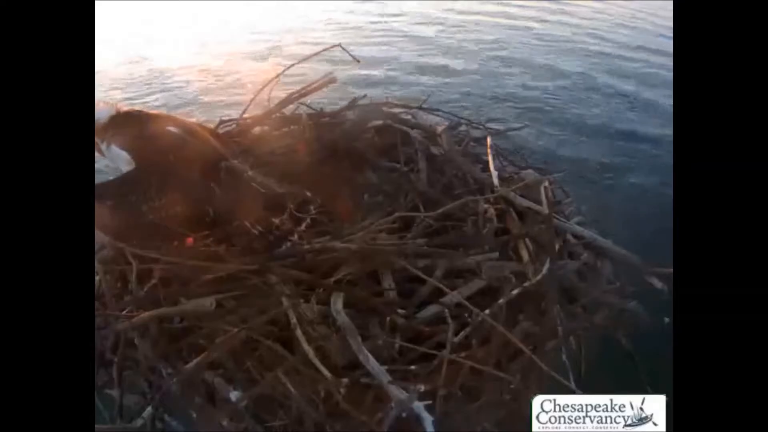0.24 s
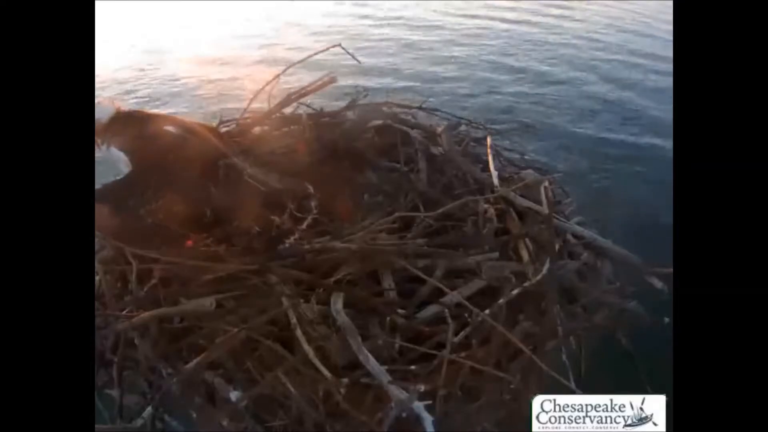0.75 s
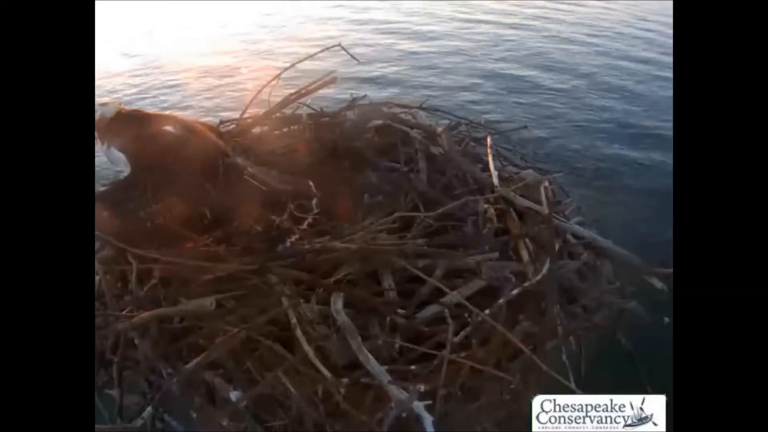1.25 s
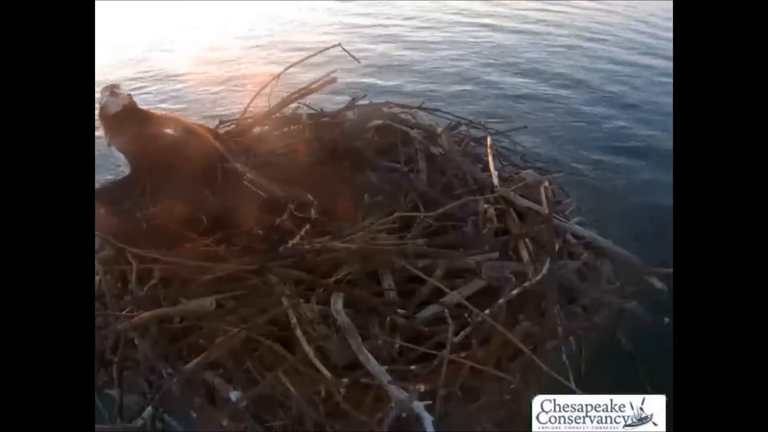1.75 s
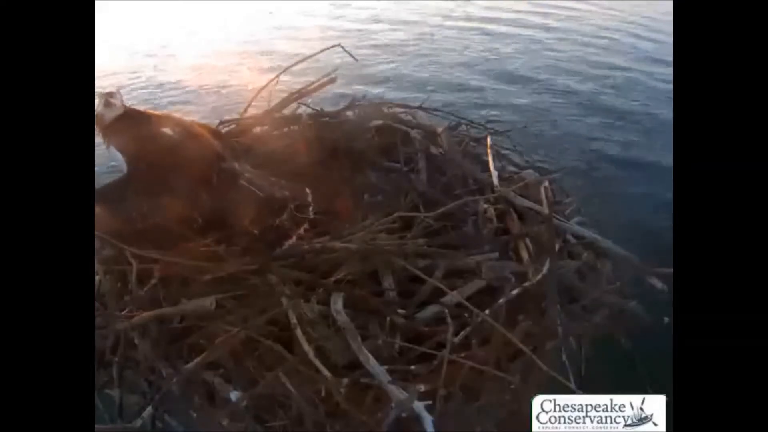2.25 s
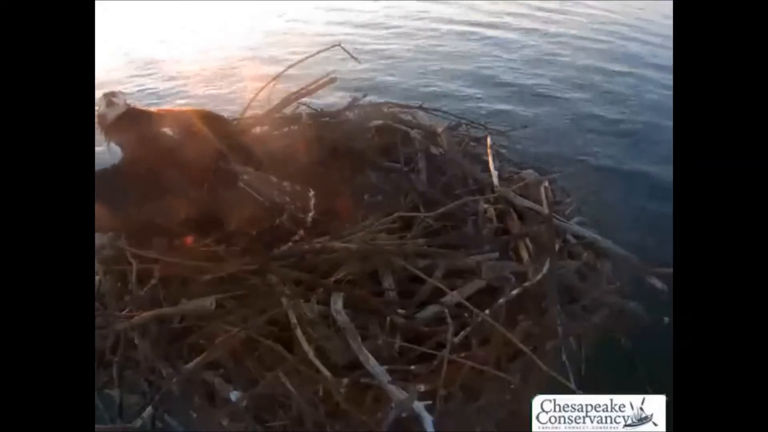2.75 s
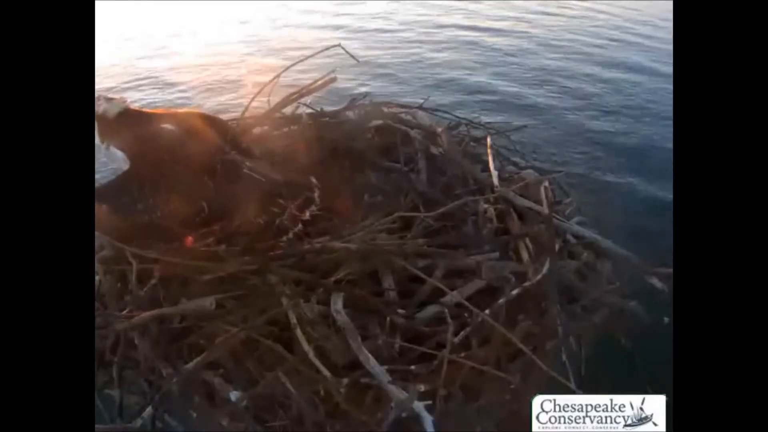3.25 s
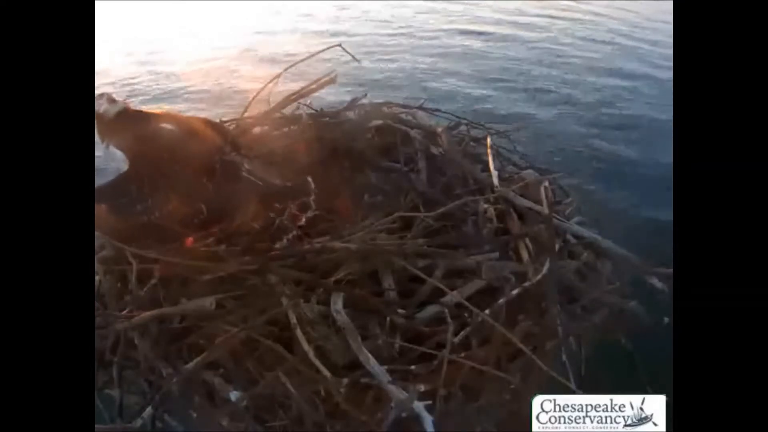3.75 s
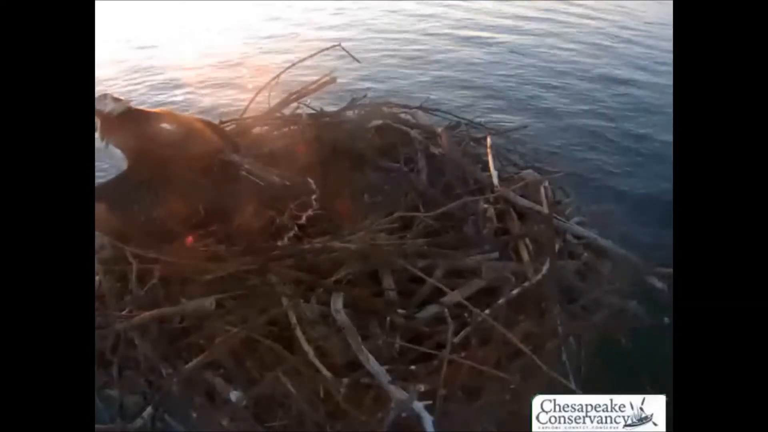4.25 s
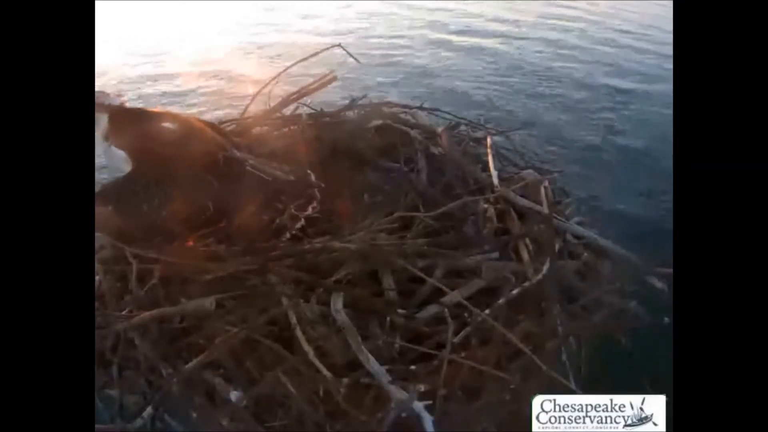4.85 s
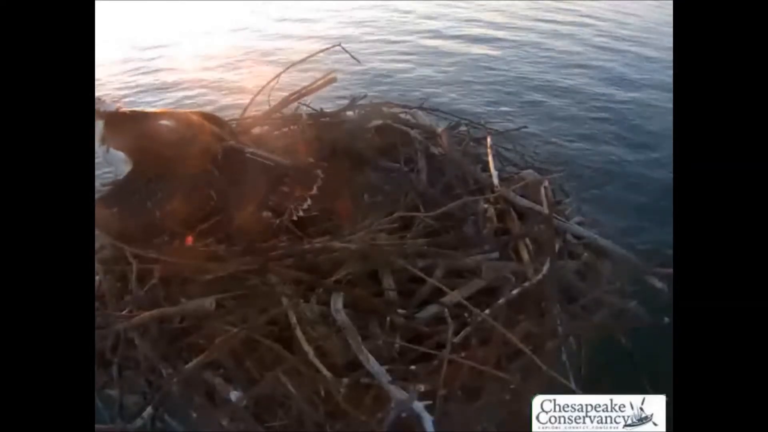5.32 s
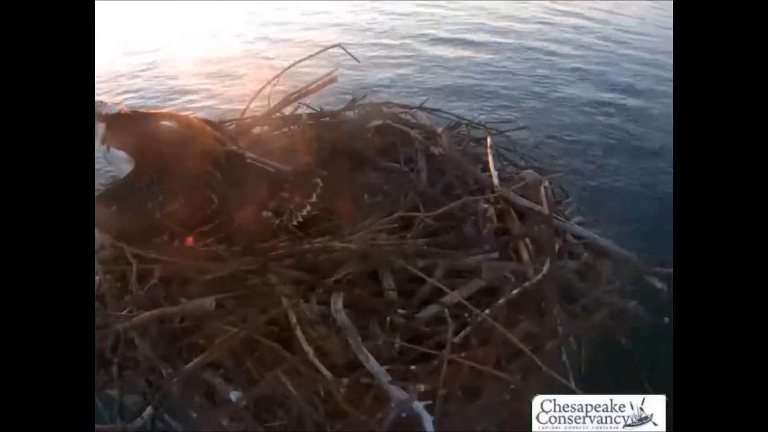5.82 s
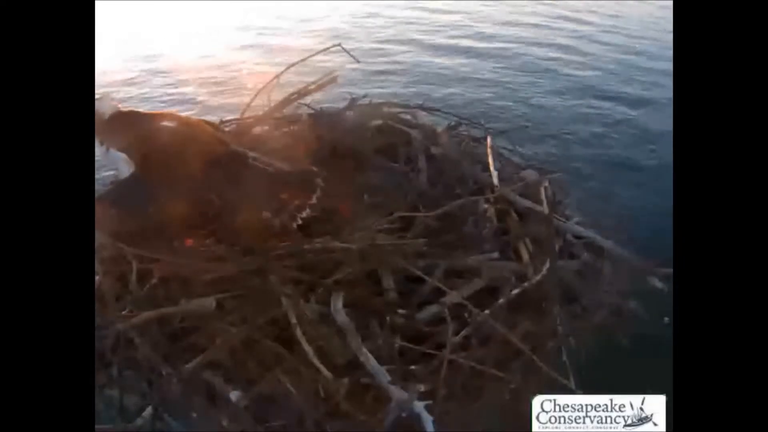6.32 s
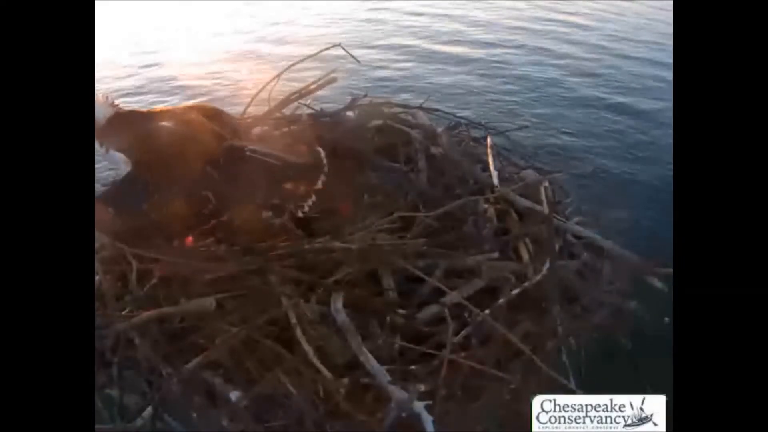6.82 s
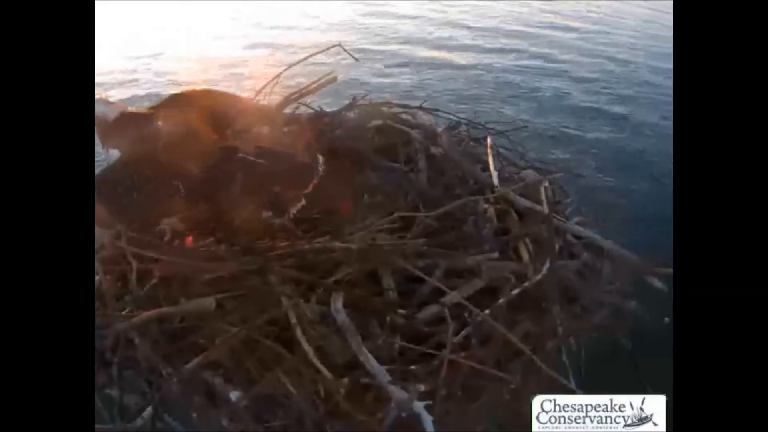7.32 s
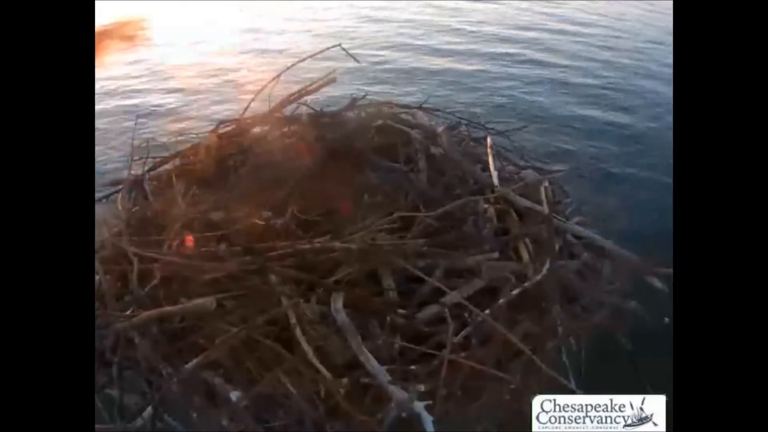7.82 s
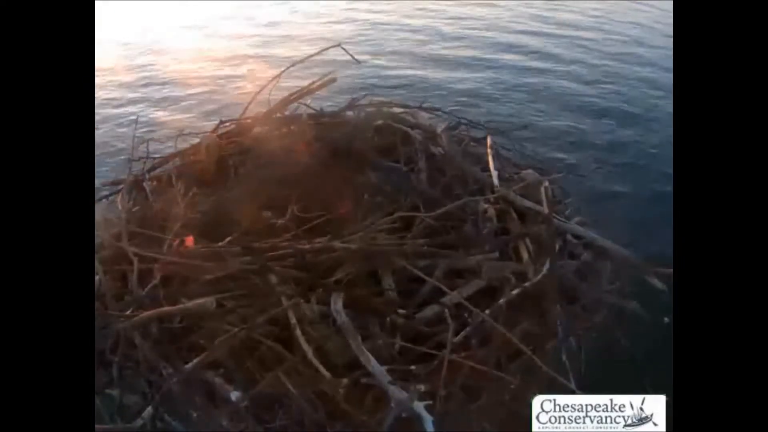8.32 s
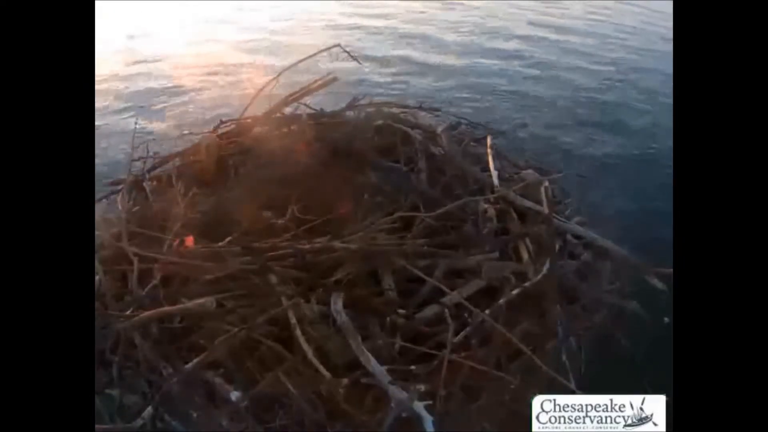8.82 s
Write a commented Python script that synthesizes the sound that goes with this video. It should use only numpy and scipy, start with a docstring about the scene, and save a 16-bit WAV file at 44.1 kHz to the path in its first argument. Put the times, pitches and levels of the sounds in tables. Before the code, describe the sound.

Outdoors at a stick nest over water, an osprey gives about fourteen short, near-pure whistled chirps, each a quick yelp, dip, climb and sometimes a squeak. They build to the loudest in the middle, then turn weak and hoarse. Late on, wings scrape and knock the sticks with a soft puff of air. A low wash lies beneath. The cheap camera microphone stutters and adds metallic treble.

```python
"""A run of whistled chirps, swelling and then fading: an osprey on its nest over water; late on, it flaps away.
Each chirp is a near-sine on a yelp-climb-ending pitch path; filtered noise makes hoarseness, wings and air.
Wind and water rumble low beneath; nest and shore scatter sparse echoes.
A nest camera samples coarsely and drops a few milliseconds of every block: stutter and metallic mirror tones."""
import sys
import numpy as np
from scipy import signal
from scipy.fft import rfft, irfft, next_fast_len
from scipy.io import wavfile
from scipy.ndimage import uniform_filter1d

SR = 44100
rng = np.random.default_rng(int(sys.argv[2]) if len(sys.argv) > 2 else 0)


def wrap_up_sound(samples):
    """Save the sound to the file named by the first command line argument, as 16-bit audio."""
    columns = np.atleast_2d(samples).T
    # keep every value between -1 and 1, then stretch to whole-number steps
    tamed = np.clip(columns, -1, 1)
    steps = np.round(tamed * 32767).astype(np.int16)
    wavfile.write(sys.argv[1], SR, steps)


N = 399987


def gain_of(db):
    """Decibels to an amplitude factor."""
    return 10 ** (np.asarray(db) / 20)


def evened(x):
    """Scales to rms 1."""
    return x / np.sqrt(np.mean(x ** 2) + 1e-20)


def read(points, hz):
    """Interpolates a (Hz, dB) table on a log-frequency axis."""
    table_hz, table_db = np.transpose(points)
    return np.interp(np.log(hz + 1), np.log(table_hz), table_db)


def band(hz, centre_hz, width_hz):
    """Gain of a resonance, 1 at its centre."""
    return 1 / (1 + (2 * (hz - centre_hz) / width_hz) ** 2)


def coloured(x, gain):
    """Filters x by a gain given as a function of frequency."""
    size = next_fast_len(len(x))
    spectrum = rfft(x, size) * gain(np.fft.rfftfreq(size, 1 / SR))
    return irfft(spectrum, size)[:len(x)]


def drift(length, rate_hz):
    """Smooth random signal near rms 1: noise under a Gaussian low-pass."""
    noise = rng.standard_normal((length // SR + 1) * SR)
    return evened(coloured(noise, lambda f: np.exp(-(f / rate_hz) ** 2)))[:length]


def add(mix, start_s, sound):
    """Mixes a sound in at a time."""
    part = mix[round(start_s * SR):][:len(sound)]
    part += sound[:len(part)]


def gesture(yelp, climb, ending):
    """Time, pitch, level and strain of one chirp: effort passes from part to part, resonances add flares."""
    start_s, rise_s, hold_s, catch_hz, crest_hz, yelp_db, strain_db = yelp
    climb_s, dip_hz, top_hz, easing, dip_db, top_db = climb
    squeak_s, fall_s, squeak_hz, end_hz, ending_db = ending
    # the whistle flares where its pitch crosses a fixed resonance: pitch_hz, gain_db
    flares = [(1950, -4.5), (2060, 0.2), (2190, -18.7), (2300, -9.0), (2400, -4.3), (2490, 2.7),
              (2560, -1.7), (2650, -2.9), (2730, -6.2), (2770, 0.9), (2815, 6.2), (2870, 1.1),
              (2950, -13.1), (3030, -6.6), (3095, 0.2), (3150, -3.5), (3200, -12.8)]
    catch_s, step_hz, step_share = 0.008, 2488, 0.75  # rise: linger on the catch, pass a middle step, jump
    arch_hz = 54.05  # yelp's ends below its crest
    break_s, settle_s, overshoot_hz = 0.00799, 0.03, 73.86  # drop to just above the dip, then settle
    dip_rounding, leap_s, fall_easing = 1.3, 0.00894, 1.48
    thinning_db_per_hz, recover_s = -0.04, 0.04  # thins with the width of the leap, then recovers
    attack_s, attack_db, release_s, release_db = 0.007, -15, 0.015, -11.9
    fall_db = -1.8  # effort lost over the final fall
    flare_lag_s = 0.004  # a resonance needs time to build, so quick sweeps flare less

    durations_s = [rise_s, hold_s, settle_s, climb_s, squeak_s, fall_s]
    risen, broken, dipped, topped, squeaked, end = np.cumsum(durations_s)
    leapt = topped + leap_s
    t = np.arange(0, end, 1 / SR)

    def progress(a, b):
        """0 before a, 1 after b."""
        return np.clip((t - a) / (b - a + 1e-9), 0, 1)

    foot_hz = crest_hz - arch_hz
    rise_knots_s = [min(catch_s, risen / 2), step_share * risen, risen]
    rising = np.interp(t, rise_knots_s, [catch_hz, step_hz, foot_hz])
    arching = crest_hz - arch_hz * (2 * progress(risen, broken) - 1) ** 2
    breaking = np.interp(t - broken, [0, break_s, settle_s], [foot_hz, dip_hz + overshoot_hz, dip_hz])
    climbing = top_hz + (dip_hz - top_hz) * (1 - progress(dipped, topped) ** dip_rounding) ** easing
    leaping = top_hz + (squeak_hz - top_hz) * progress(topped, leapt)
    falling = end_hz + (leaping - end_hz) * (1 - progress(squeaked, end)) ** fall_easing
    stages = [t < risen, t < broken, t < dipped, t < topped]
    hz = np.select(stages, [rising, arching, breaking, climbing], falling)

    effort = np.interp(t, [broken, dipped, topped, leapt], [yelp_db, dip_db, top_db, ending_db])
    effort = effort + fall_db * progress(squeaked, end)
    recovery = np.exp(-np.maximum(t - leapt, 0) / recover_s)
    thinning = thinning_db_per_hz * np.maximum(leaping - top_hz, 0) * recovery
    attack = attack_db * (1 - progress(0, attack_s))
    release = release_db * progress(end - release_s, end)
    flare = uniform_filter1d(read(flares, hz), round(flare_lag_s * SR), mode="nearest")
    return start_s + t, hz, effort + thinning + attack + release + flare, strain_db


def chirp(t, hz, db, strain_db, jitter=0.0033, slack_jitter=0.00429, jitter_hz=170, flutter_db=1.0,
          slack_flutter_db=2.0, flutter_hz=60, octave_follows=0.65, rasp_db=-27.5, slack_rasp_db=6.5,
          soft_start_db=-11):
    """A near-sine whistle with a weak octave and a little rasp; weak calls are less steady."""
    # octave strength before level, strain and start terms: pitch_hz, level_db
    overtone = [(2050, -54), (2280, -41), (2420, -49.5), (2550, -64), (2680, -54.5), (2850, -64),
                (3000, -59.5), (3200, -69)]
    usual_db = -36  # whistle level at which the overtone table holds
    since_start_s = t - t[0]
    slack = np.clip((-27.5 - db.max()) / 8, 0, 1)  # 0 strong call, 1 weak

    wobble = (jitter + slack_jitter * slack) * drift(len(t), jitter_hz)
    phase = 2 * np.pi * np.cumsum(hz * (1 + wobble)) / SR
    flutter = (flutter_db + slack_flutter_db * slack) * drift(len(t), flutter_hz)
    whistle = gain_of(db + flutter) * np.sin(phase)

    octave_db = read(overtone, hz) + octave_follows * (db - usual_db) + strain_db
    octave_db = octave_db + 3.5 * drift(len(t), 41)
    # the voice starts pure; the octave grows in as the pressure builds
    octave_db = octave_db + soft_start_db * np.exp(-since_start_s / 0.035)
    octave = gain_of(octave_db) * np.sin(2 * phase)

    rasp = gain_of(db + rasp_db + slack_rasp_db * slack) * drift(len(t), 1300) * np.sin(phase)
    fade = np.clip(np.minimum(since_start_s, t[-1] - t) / 0.0017, 0, 1)
    return t[0], np.sqrt(2) * fade * (whistle + octave + rasp)


def hoarseness():
    """Where the voice turns hoarse, noise passes the throat's resonance, with a screech band above it."""
    # hoarse stretches: start_s, end_s, hiss_db, screech_db
    hoarse = [(0.162, 0.311, -57.5, -60.5), (.76, 0.907, -55.5, -65), (1.628, 1.662, -46.5, -65),
              (6.593, 6.722, -61, -59), (7.119, 7.33, -56, -73), (7.576, 7.883, -54, -72),
              (8.138, 8.42, -55, -77), (8.94, 9.07, -71, -75.5)]
    throat_hz, throat_width_hz = 2670, 740
    screech_hz, screech_width_hz = 3930, 780
    out = np.zeros(N)
    for start_s, end_s, hiss_db, screech_db in hoarse:
        length = round((end_s - start_s) * SR)
        noise = rng.standard_normal(length)
        hiss = evened(coloured(noise, lambda f: band(f, throat_hz, throat_width_hz) ** 2))
        screech = evened(coloured(noise, lambda f: band(f, screech_hz, screech_width_hz) ** 2))
        burst = gain_of(hiss_db) * hiss + gain_of(screech_db) * screech
        add(out, start_s, burst * signal.windows.tukey(length, 0.5))
    return out


def wings(brush_db=-2, grain_db=1.5, draft_hz=70):
    """Scrapes and knocks of feathers and feet ring the sticks; the wingbeats puff at the microphone."""
    # wings and feet brush the sticks as the bird leaves: time_s, level_db (before brush_db)
    brush = [(7.42, -82), (7.428, -64.5), (7.546, -59.5), (7.558, -57), (7.584, -67.5), (7.674, -49.5),
             (7.9, -81)]
    # feet and wing tips strike the sticks: time_s, level_db, decay_s
    knocks = [(7.067, -52, 0.02), (7.553, -53.5, 0.0196), (7.654, -45, 0.021), (7.677, -40, 0.023),
              (7.727, -49, 0.0092)]
    # nest resonances: centre_hz, width_hz, relative_db
    stick_modes = [(200, 240, -7), (720, 440, -12.5), (1120, 170, -5), (1251, 56, 10.5), (1610, 720, -15.5),
                   (2110, 320, -11.5)]
    # air thrown at the microphone by the wingbeats: time_s, level_db
    downdraft = [(7.45, -67), (7.58, -60), (7.76, -54.5), (7.9, -73)]
    t = np.arange(N) / SR

    brush_s, brush_levels_db = np.transpose(brush)
    stroke = gain_of(brush_db) * np.interp(t, brush_s, gain_of(brush_levels_db), 0, 0)
    for knock_s, knock_db, decay_s in knocks:
        stroke = stroke + gain_of(knock_db) * (t > knock_s) * np.exp(-abs(t - knock_s) / decay_s)

    def ringing(f):
        """Summed gain of the nest resonances."""
        return sum(gain_of(db) * band(f, hz, width_hz) for hz, width_hz, db in stick_modes)

    scrape = rng.standard_normal(N) * gain_of(grain_db * drift(N, 70))
    sticks = evened(coloured(scrape, ringing))

    draft_s, draft_db = np.transpose(downdraft)
    puff = evened(coloured(rng.standard_normal(N), lambda f: band(f, draft_hz / 2, draft_hz)))
    return stroke * sticks + np.interp(t, draft_s, gain_of(draft_db), 0, 0) * puff


def surroundings(x, near_db=-16, near_t60_s=0.13, shore_db=-28, shore_delay_s=0.24, shore_t60_s=0.39):
    """Sparse decaying echoes: nest and platform scatter a short tail; the shore answers later."""
    # colour of the shore echo: freq_hz, gain_db
    shore_colour = [(2000, -19), (2700, -24), (2900, -16), (3100, -7), (3300, -9.5), (4500, -15.5)]
    t = np.arange(SR) / SR
    signs = rng.choice([-1., 1.], (2, SR))
    near, far = signs * (rng.random((2, SR)) < 3000 / SR)  # about 3000 echoes per second
    near = near * gain_of(-60 * t / near_t60_s) * (t > 0.004)
    far = far * gain_of(-60 * t / shore_t60_s) * (t > shore_delay_s)
    near = near / np.linalg.norm(near)
    far = coloured(far / np.linalg.norm(far), lambda f: gain_of(read(shore_colour, f)))
    return signal.fftconvolve(x, gain_of(near_db) * near + gain_of(shore_db) * far)[:N]


def air(level_db=-58.5, swell_db=0.32):
    """A dull wash of wind and water, shaped noise that swells a little."""
    # wind and water spectrum: freq_hz, relative_db
    air_colour = [(20, 0), (45, -0.5), (95, 1.5), (200, -4), (400, -9), (800, -14), (1500, -16.5),
                  (2600, -21.5), (3300, -27), (4000, -27), (4600, -62)]
    wash = coloured(rng.standard_normal(N), lambda f: gain_of(read(air_colour, f)))
    return gain_of(level_db + swell_db * drift(N, 4)) * evened(wash)


def scene():
    """The bird, its echoes, its wings and the open air."""
    # One row per chirp, same order in all three tables; levels before flares, edges and flutter.
    # opening yelp, sliding up from a low catch:
    # start_s, rise_s, hold_s, catch_hz, crest_hz, level_db, strain_db (extra on the octave)
    yelps = [(0.0, 0.019, 0.038, 2432, 2558, -41, 7), (0.586, 0.024, 0.043, 2349.0, 2560, -39.2, 3.5),
             (1.262, 0.025, 0.052, 2110.0, 2915, -36, 0), (1.91, 0.023, 0.053, 2050.0, 2782, -34.5, -3),
             (2.6, 0.031, 0.04, 2079.0, 2815, -33.5, -3.5), (3.223, 0.039, 0.028, 2260.0, 3023, -35, -2.5),
             (3.946, 0.029, 0.047, 2077.0, 2836, -35, -4), (4.67, 0.02, 0.055, 2045.0, 2801, -33, -1.5),
             (5.422, 0.034, 0.034, 2200.0, 3023, -27.5, 2.5), (6.329, 0.02, 0.041, 2054, 2867, -39.5, 6.5),
             (6.953, 0.023, 0.054, 2205.0, 2500, -38.5, 3.5),
             (7.614, 0.0032, 0.0358, 2566.0, 2650, -41.5, -7),
             (8.152, 0.034, 0.057, 2197, 2710, -42.5, -3.5), (8.962, 0.022, 0.049, 2400.0, 2520, -56, -3.0)]
    # break to a dip and climb again: length_s, dip_hz, top_hz, easing (1 = straight), dip_db, top_db
    climbs = [(0.124, 2443.0, 2676.0, 1.65, -45, -49.5), (0.132, 2401.0, 2687.0, 1.41, -46, -43.0),
              (0.119, 2363.0, 2638.0, 1.5, -40.5, -31.5), (0.191, 2250.0, 2625.0, 2.0, -34.5, -34.5),
              (0.236, 2155.0, 2727.0, 2.09, -34.5, -34.7), (0.183, 2359.0, 2818.0, 1.46, -42, -32.5),
              (0.216, 2285.0, 2794.0, 1.94, -38, -32.5), (0.159, 2205.0, 2660.0, 1.9, -31.5, -29.5),
              (0.197, 2325.0, 2822.0, 2.71, -33.0, -25.5), (0.29, 2245.0, 2815.0, 2.6, -43.0, -37.0),
              (0.212, 2157.0, 2653.0, 2.41, -48, -44.5), (0.142, 2628.0, 2749.0, 1.22, -46, -28),
              (0.072, 2282.0, 2494.0, 0.825, -49.5, -42.7), (0.2, 1960.0, 2000.0, 1.0, -58, -61.3)]
    # possible leap to a squeak, then the fall: squeak_s, fall_s, squeak_hz, end_hz, level_db
    endings = [(.085, .04, 2570, 2490, -45.5), (.089, .064, 2490, 2580, -48.5),
               (.065, .066, 2960, 2460, -34), (.002, .044, 2632, 2462, -33), (.014, .025, 2729, 2427, -38),
               (.046, .036, 3066, 2540, -30), (.034, .04, 3050, 2500, -30), (.116, .032, 3101, 2470, -23),
               (.064, .036, 3185, 2540, -24.5), (.012, .031, 2822, 2480, -41),
               (.028, .03, 2939, 2470, -38.5), (.003, .068, 2778, 2050, -43),
               (.036, .022, 2805, 2770, -39.5), (.01, .04, 2000, 2000, -61)]
    bird = hoarseness()
    for parts in zip(yelps, climbs, endings):
        add(bird, *chirp(*gesture(*parts)))
    return (bird + surroundings(bird) + wings() + air())[None]


def record(dry, seam_loss=0.68):
    """A bright microphone, sampled with no guard filter, with dropouts, then stretched by straight lines."""
    camera_step, player_step = 5.5, 4  # output samples per coarse sample, per player sample
    block = 512  # coarse samples
    edge_hz = 15850  # final low-pass
    presence = [(300, -0.5), (1000, -0.5), (1600, -1.36), (2200, 1.5), (2700, 4.0), (3100, 7.5)]  # freq_hz, gain_db
    bright = coloured(dry[0], lambda f: gain_of(read(presence, f)))
    # about 8000 samples a second: the octave folds down and moves against the whistle
    coarse = signal.resample_poly(bright, 2, 1)[::round(2 * camera_step)]
    index = np.arange(len(coarse))
    place = index % block
    # each block has two short holes side by side, and two packet seams that tick
    hole = ((place >= 32) & (place < 62)) | ((place >= 64) & (place < 94))
    seam = (place == 223) | (place == 383)
    coarse = coarse * ~hole * (1 - seam_loss * seam)
    # two straight-line rate changes mirror the whistle up into the treble
    grid = np.arange(0, N, player_step)
    played = np.interp(grid, index * camera_step, coarse)
    out = np.interp(np.arange(N), grid, played)
    lowpass = signal.firwin(511, edge_hz, window=("kaiser", 9), fs=SR)
    return signal.oaconvolve(out, lowpass, "same")[None]


dry = scene()
out = record(dry)
wrap_up_sound(out)
```